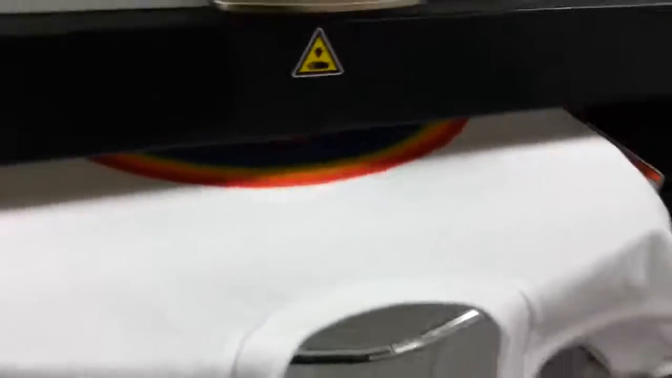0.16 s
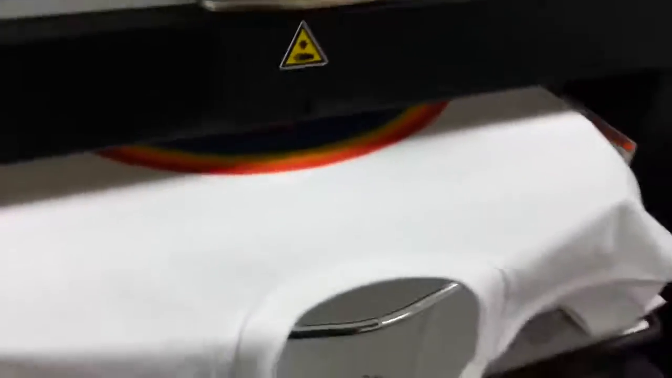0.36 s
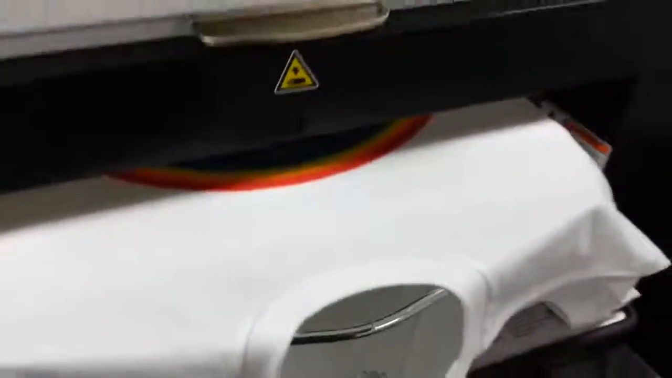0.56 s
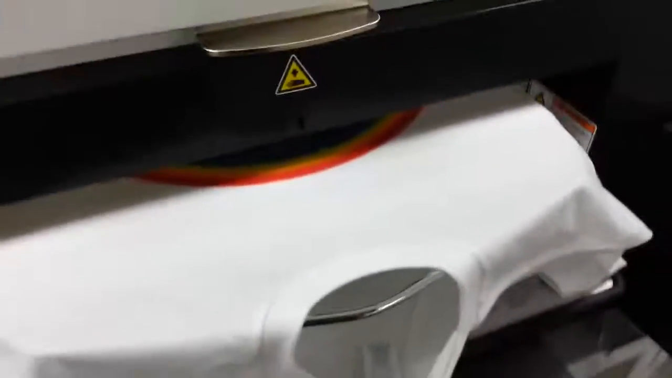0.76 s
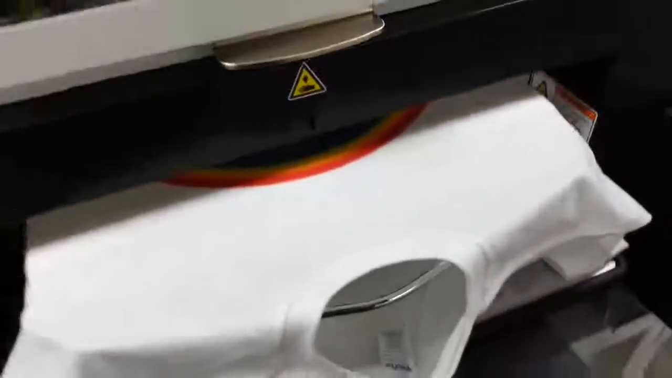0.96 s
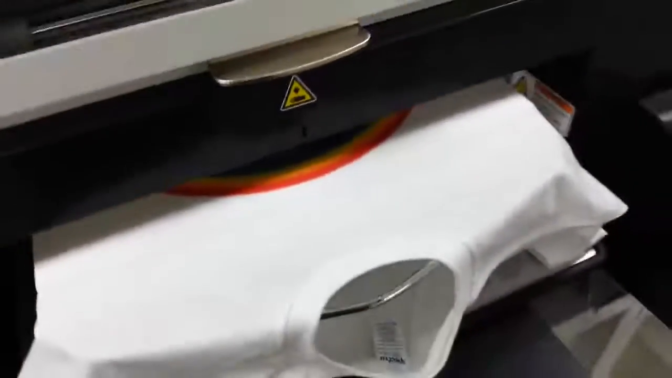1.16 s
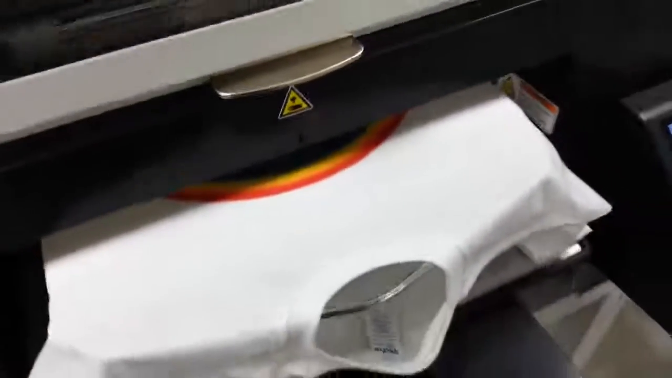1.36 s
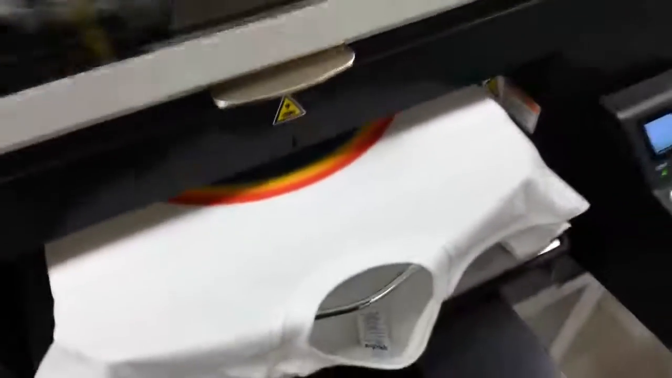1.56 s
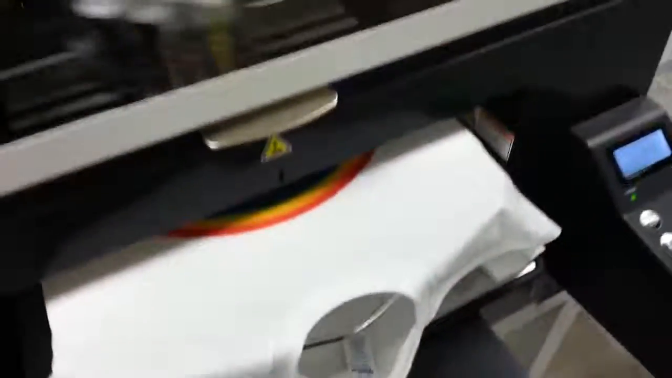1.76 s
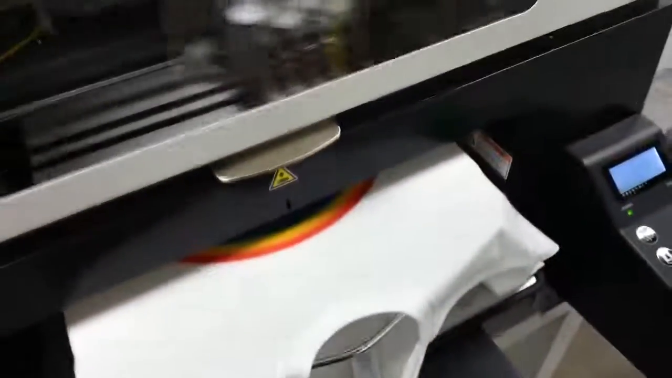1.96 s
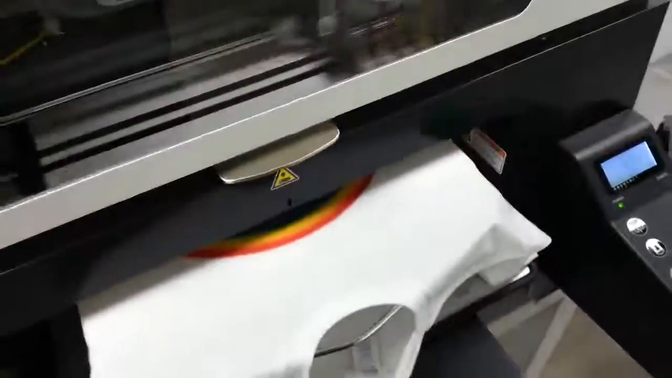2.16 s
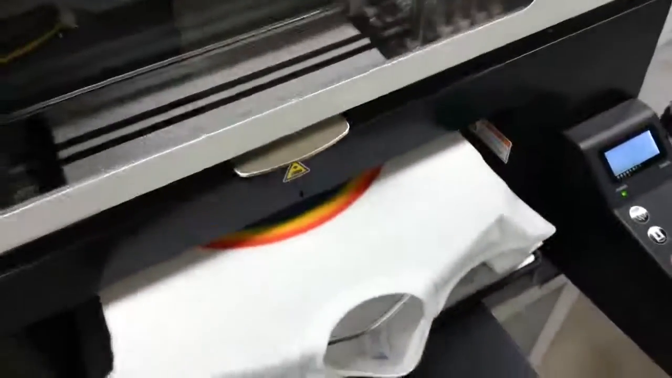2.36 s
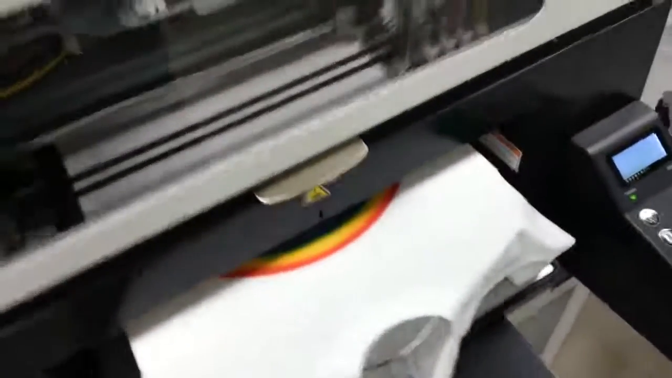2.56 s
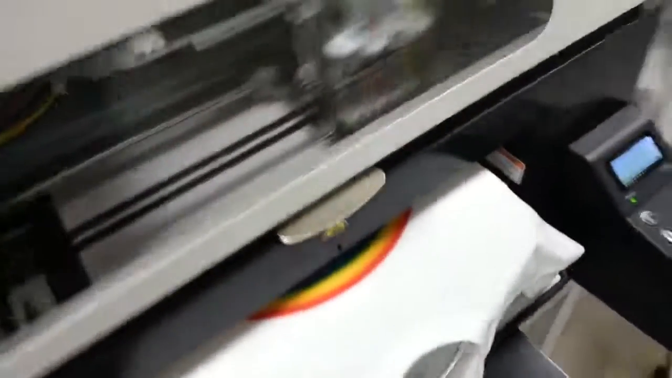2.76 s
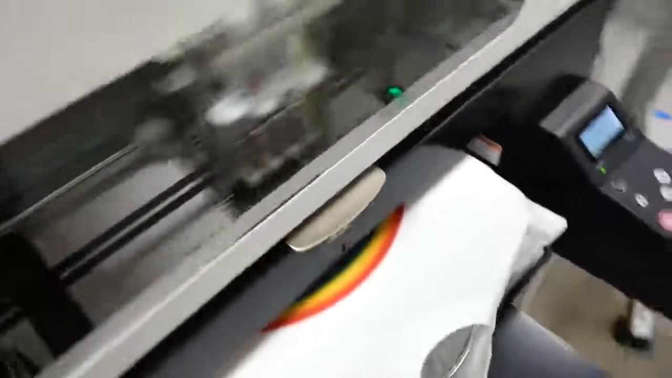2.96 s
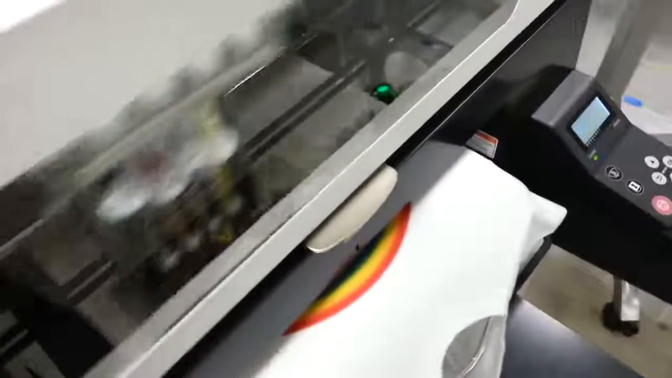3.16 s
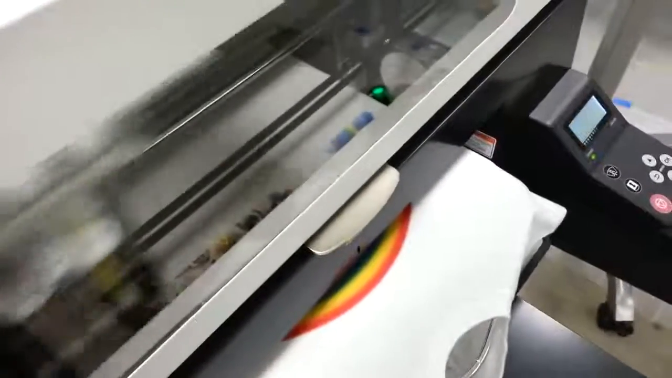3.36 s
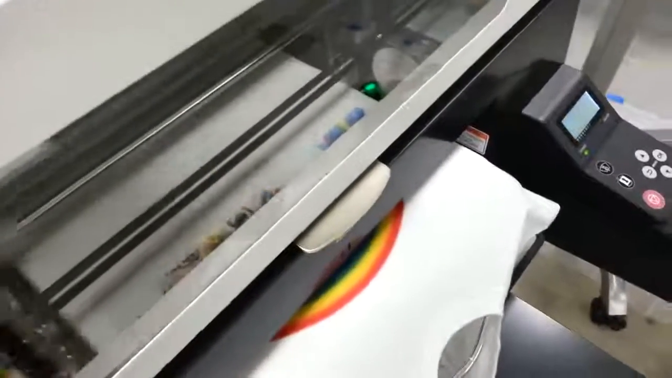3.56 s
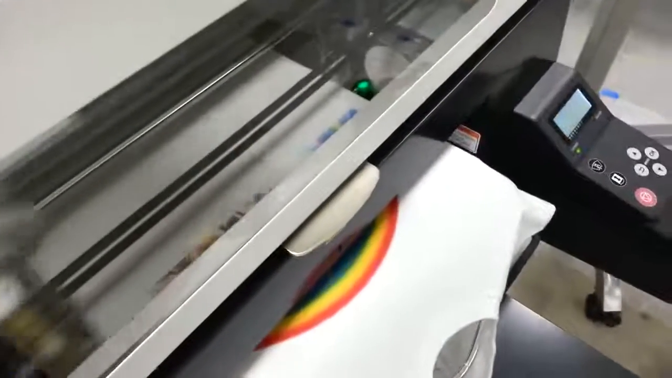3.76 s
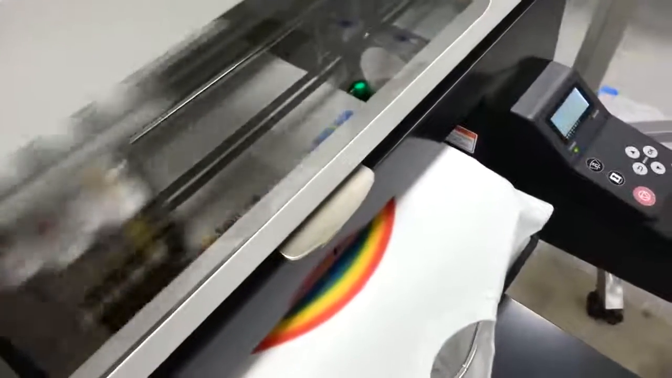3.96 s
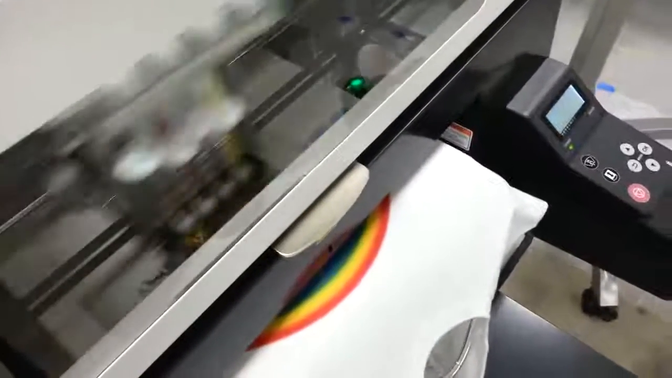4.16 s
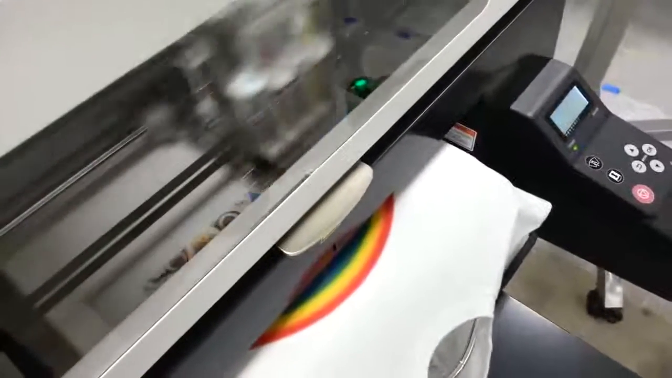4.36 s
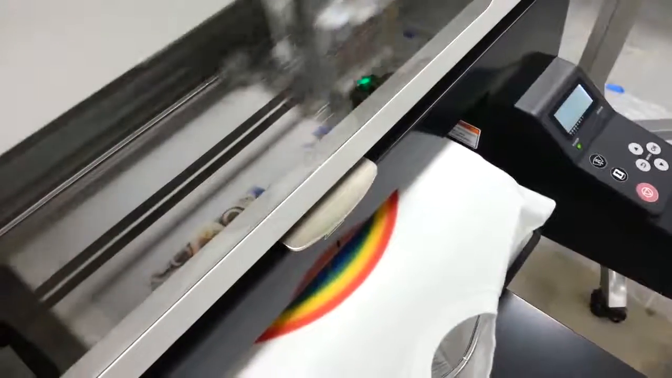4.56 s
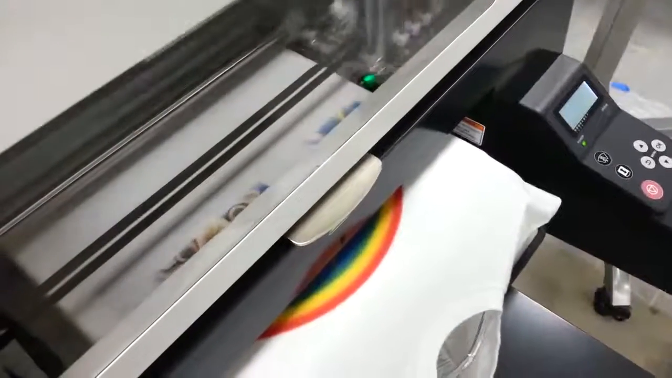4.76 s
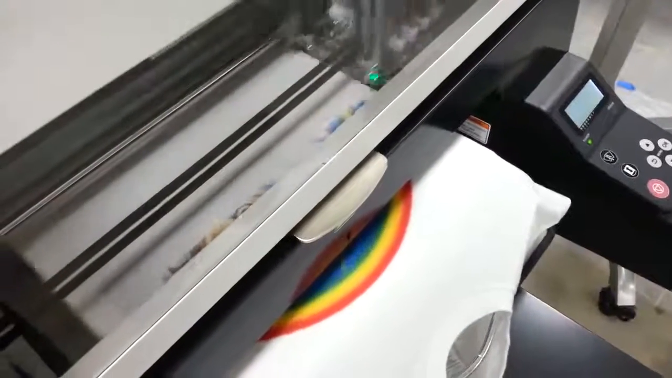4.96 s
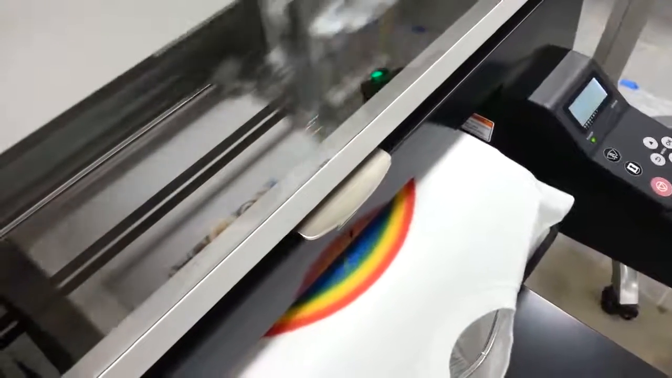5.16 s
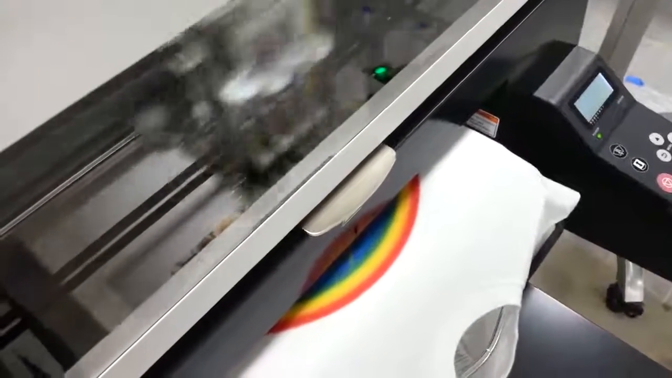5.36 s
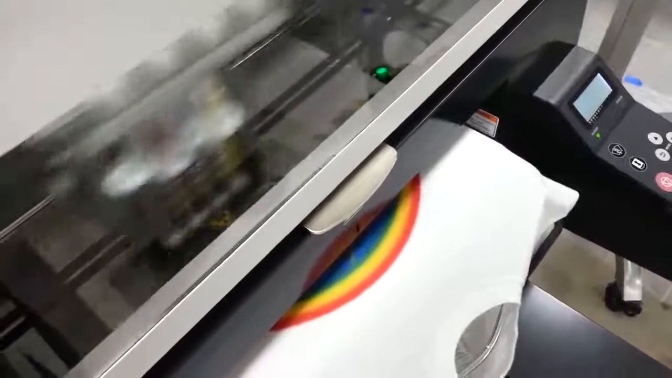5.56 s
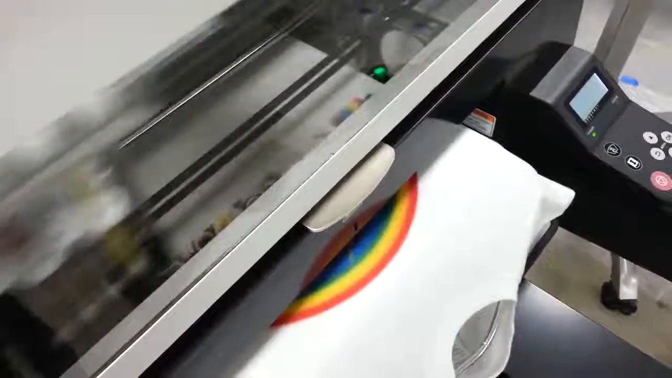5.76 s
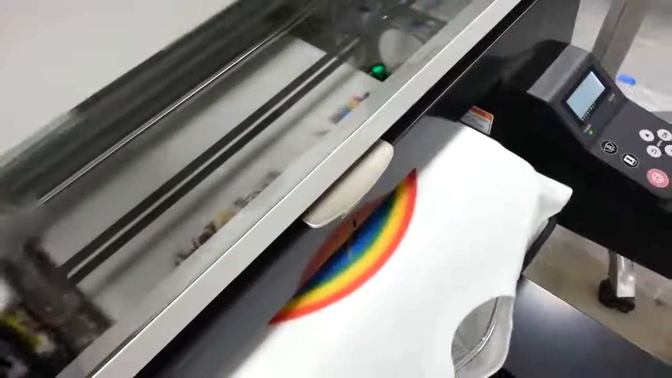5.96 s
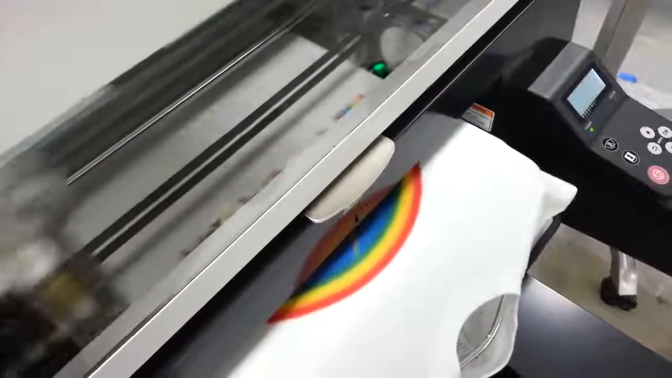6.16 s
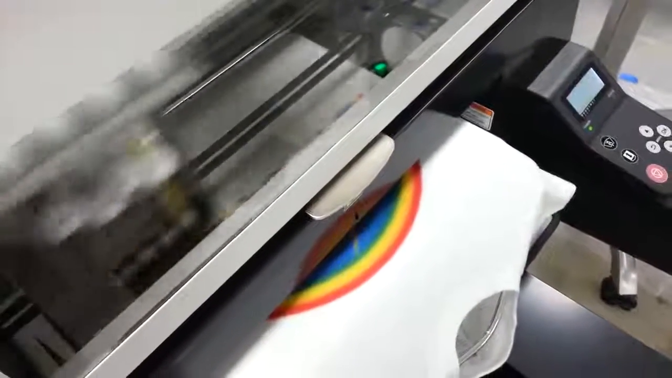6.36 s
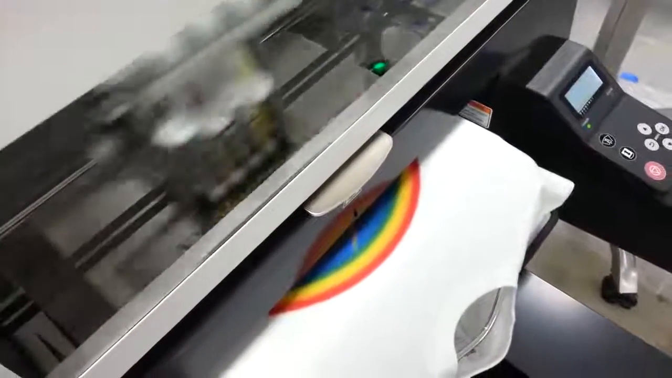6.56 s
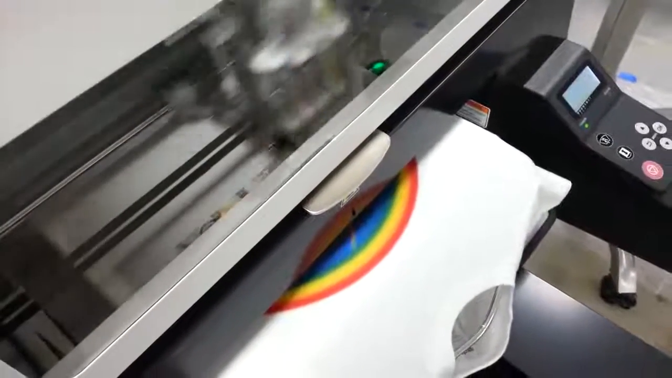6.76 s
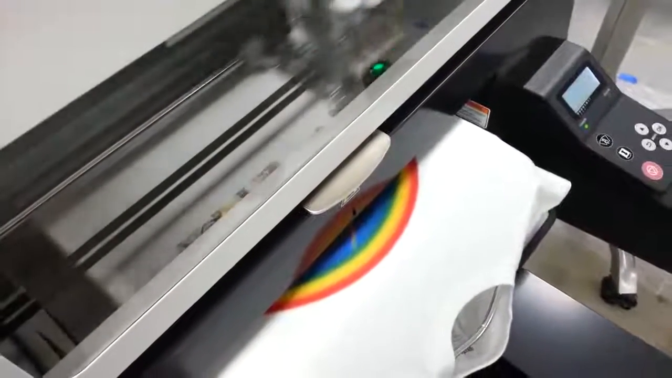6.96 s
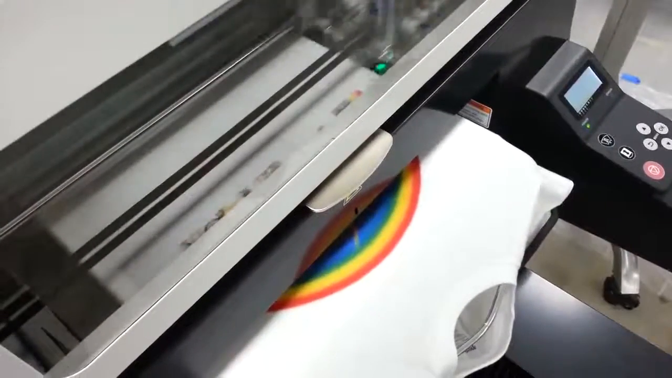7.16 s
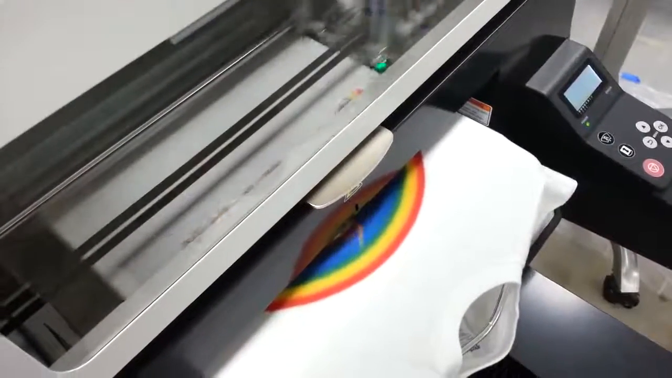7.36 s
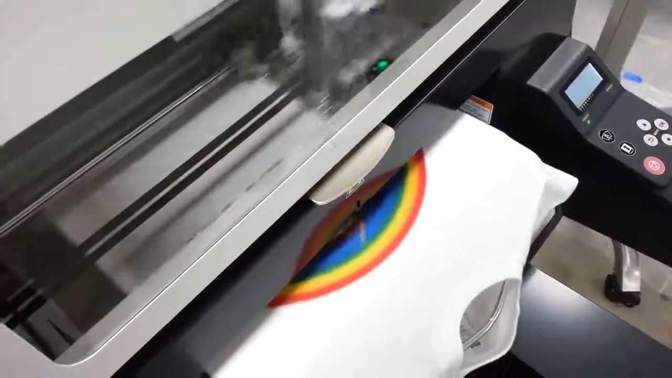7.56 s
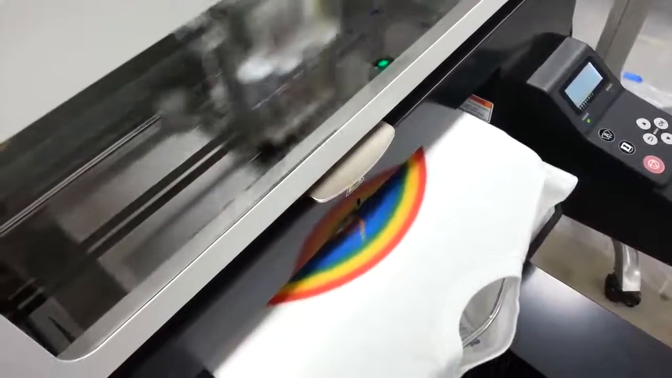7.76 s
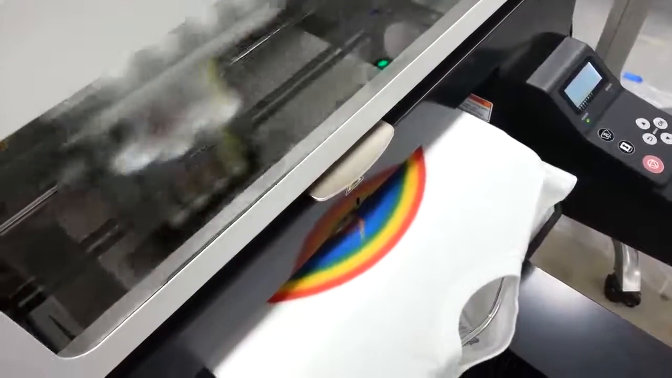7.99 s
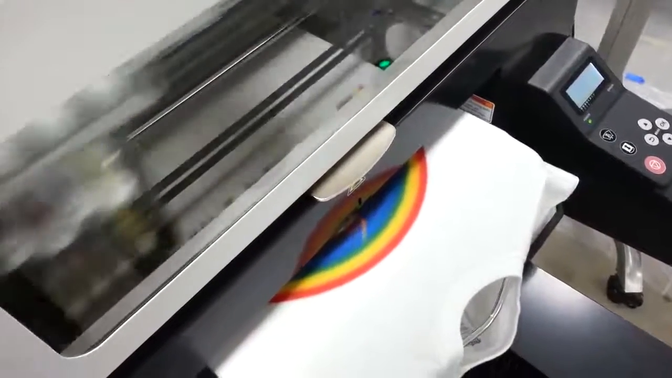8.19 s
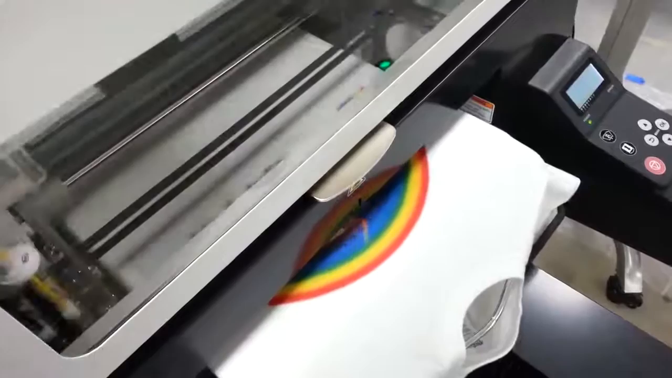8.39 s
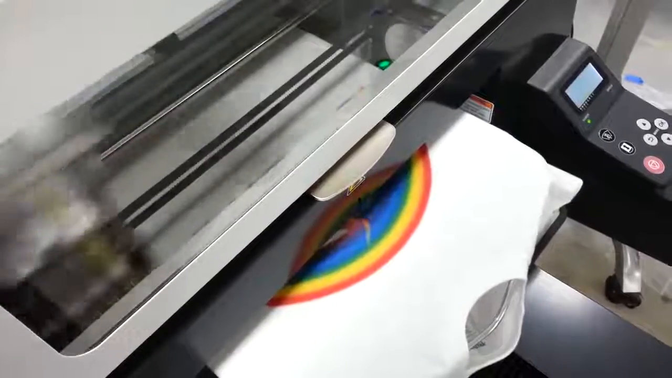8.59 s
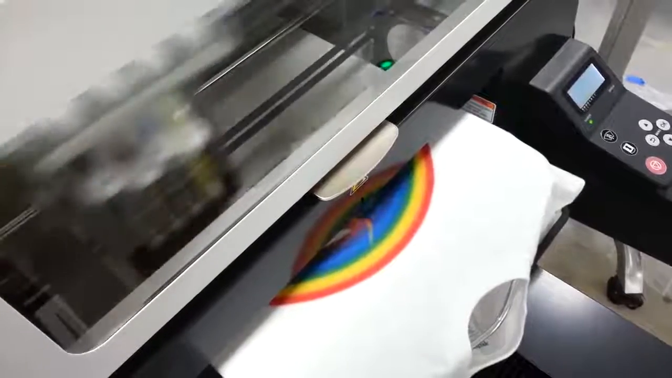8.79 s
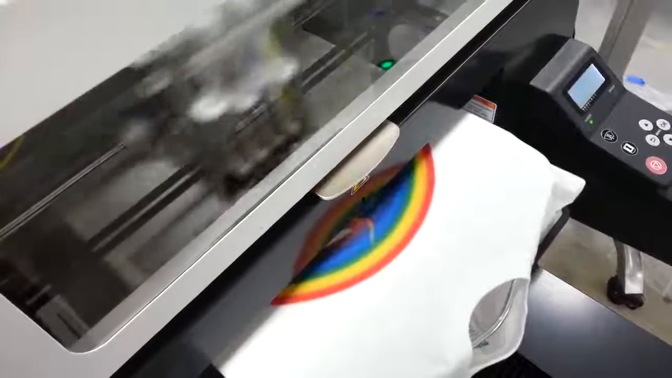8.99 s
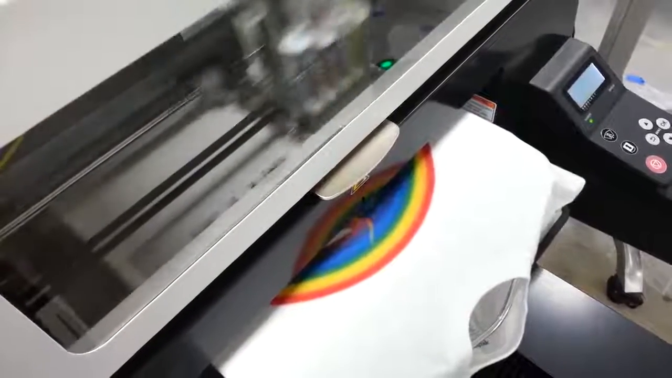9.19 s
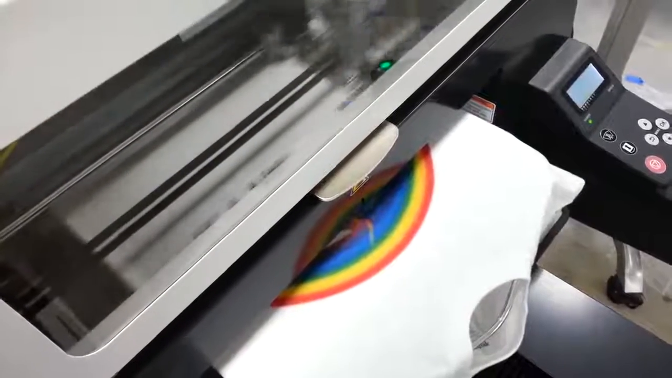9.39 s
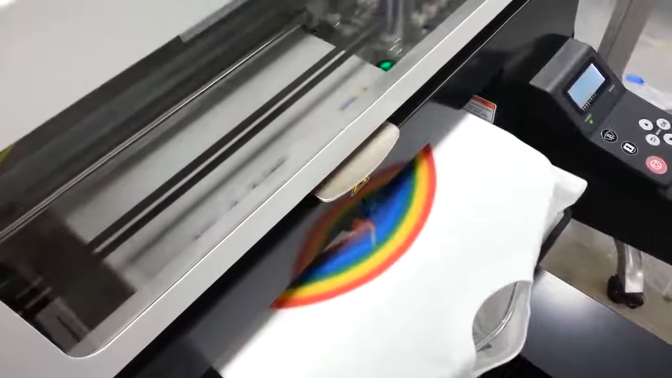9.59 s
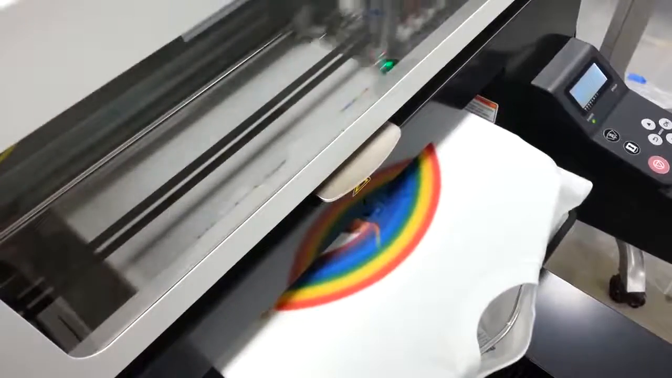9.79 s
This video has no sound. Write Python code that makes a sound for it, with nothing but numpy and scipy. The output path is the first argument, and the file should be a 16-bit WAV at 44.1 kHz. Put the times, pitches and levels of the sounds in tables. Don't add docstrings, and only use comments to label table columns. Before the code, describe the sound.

In a reverberant workshop, a nearby garment printer works over steady mains hum and fan wash. At about 0.17 s the belt snatches with the hardest bracket rattle, and the carriage reaches full speed by 0.25 s: a constant-pitch, buzzy tooth whine with mid-heavy rail hiss. It eases off near 1.1 s, the whine falling away, with a dull thump, a brief lull, then another thump and surge into the return stroke by 1.4 s. The cycle repeats with braking near 2.3, 3.5, 4.7, 5.9, 7.1, 8.3 and 9.5 s. Rattles mark outward starts near 2.6, 5.0, 7.4 and 9.8 s; return strokes throb more. Handling ticks occur near 0.7, 1.65 to 1.8 (the strongest) and 2.9 s. The whine's overtones shift as the handheld stereo microphone moves early on; faint wall echoes follow, and the last outward stroke is just under way at the end.

```python
import sys
import numpy as np
from scipy import signal
from scipy.io import wavfile
from scipy.ndimage import uniform_filter1d, map_coordinates

SR = 44100
rng = np.random.default_rng(int(sys.argv[2]) if len(sys.argv) > 2 else 0)


def unload_audio(sound):
    columns = np.transpose(np.atleast_2d(sound))
    steps = np.round(np.clip(columns, -1, 1) * 32767)
    wavfile.write(sys.argv[1], SR, steps.astype(np.int16))


def invert_db(x):
    u = np.asarray(x, float) / 20
    return 10 ** u


N = 433503
T = np.arange(N) / SR
TEETH = 9

# (start of braking from the stroke before [s], full speed reached [s])
STROKES = [
    (-.13, .245),
    (1.075, 1.44),
    (2.27, 2.63),
    (3.47, 3.85),
    (4.675, 5.04),
    (5.88, 6.26),
    (7.085, 7.445),
    (8.285, 8.655),
    (9.485, 9.855),
]
SHAFT_HZ = [62.82, 62.70]
# (time [s], order 18 [dB], order 27 [dB], order 36 [dB], rail [dB])
NEARNESS = [(.25, -5, -2, 1.5, 2.5), (.45, -5.5, 6, 5.8, 3), (.55, -15.5, 9.5, -1, 1.5),
            (1.1, -8, 1.5, .3, -1.2), (1.5, -1, -12, -5, -0.5), (1.8, -3.5, -19, -8.5, -0.1),
            (2.3, -3, -12, 2.5, 0.5), (2.8, -2.2, -5, 0, 0.7), (3.3, 1.1, -1, 3.5, 0.6),
            (4.2, 0.3, 3.3, -0.4, -1.1), (5.4, -0.2, -4.5, -.3, 1.25), (6.7, 2.5, 4.5, 2.5, -0.2),
            (7.7, 0.5, 1, -4.5, 1), (9, 3.5, 3, 2, .3)]


def motor(speed, turns, outward):
    whine_side = [-9.5, 0.41, -5.5]
    weak_orders = [9, 16, 26, 28, 29, 32, 34, 35, 37, 44, 45, 52, 54, 55, 58, 63, 64, 72, 73, 80, 99]
    # (outward [dB], backward [dB], side minus mid [dB])
    weak_levels = [(-42, -59, -21), (-50, -49, 5), (-41, -47.5, 4), (-36.5, -45, 4.5), (-50, -52, -6),
                   (-45.5, -42, 8.5), (-48, -59, -14), (-51, -36.5, 5), (-42.5, -40, -13), (-40.5, -55, -8),
                   (-44, -60, 6), (-45.5, -55, -12), (-50, -43, 4), (-43.5, -70, -3), (-47, -71, 6),
                   (-50, -47, -4), (-49.5, -46, -1), (-58, -47, 0), (-66, -70, -17), (-52.5, -70, -8),
                   (-62.5, -55.5, -8)]
    idler_orders = [54, 58]

    share = speed / SHAFT_HZ[0]
    heard = np.clip((share - .4) / .2, 0, 1)
    shudder = 1 - share
    turns = turns + .12 * shudder * wander(200)
    out = np.zeros((2, N))
    for multiple, side_db, place_db in zip([2, 3, 4], whine_side, whine_db(T)):
        level_db = place_db + 2.2 * wander(25) - 28 * shudder * abs(wander(200))
        out += partial(TEETH * multiple, heard * invert_db(level_db), side_db, turns)

    load_db = rail_db(T)[1]
    throb_db = chain_db(turns, outward)
    fall = np.where(stroke_age(T)[0] < 0, 4, 10)
    for order, (out_db, back_db, side_db) in zip(weak_orders, weak_levels):
        bite = 1.9 if order % 18 == 0 else .6
        throb = 1.9 if order in (72, 73) else .5
        level_db = np.where(outward, out_db, back_db) + bite * load_db
        level_db += 2.2 * wander(60) + throb * throb_db
        if order in idler_orders:
            level_db += 8.0 * (T < 1.3)
        out += partial(order, invert_db(level_db) * share ** fall, side_db, turns)
    return out


def partial(order, level, side_db, turns):
    blur = (0.31 + 0.0047 * order) * wander(14)
    phase = 2 * np.pi * (order * turns + rng.random()) + blur
    side = invert_db(side_db) * np.cos(phase + 2 * np.pi * rng.random() + 0.67 * wander(1.384))
    return np.sqrt(2) * level * (np.cos(phase) + np.array([side, -side]))


def whine_db(t):
    # (time from full speed [s], order 18 [dB], order 27 [dB], order 36 [dB])
    span_out = [(-.07, -37, -45, -40), (-.043, -10.5, -47, -23.5), (-.015, -17, -42, -32),
                (.025, -19.5, -30, -18), (.1, -23, -32.5, -32), (.37, -21, -39.5, -23),
                (.6, -21.5, -34, -26), (.82, -22, -36.5, -28), (.92, -50, -48, -73)]
    # (time from full speed [s], order 18 [dB], order 27 [dB], order 36 [dB])
    span_back = [(-.045, -44, -45, -40), (.01, -28.5, -34.5, -21), (.1, -29, -36.5, -28),
                 (.25, -22, -33.5, -22), (.45, -31, -37, -32.5), (.6, -25.5, -34.5, -26),
                 (.82, -31.5, -33, -47), (.865, -21.5, -45, -46), (.93, -42, -36, -48)]

    age, outward = stroke_age(t)
    out_s, *out_levels = np.transpose(span_out)
    back_s, *back_levels = np.transpose(span_back)
    camera_s, *near_levels = np.transpose(NEARNESS)
    levels = []
    for out_db, back_db, near_db in zip(out_levels, back_levels, near_levels):
        belt_db = np.where(outward, np.interp(age, out_s, out_db), np.interp(age, back_s, back_db))
        levels.append(belt_db + np.interp(t, camera_s, near_db))
    return levels


def motion():
    # (time before full speed [s], share of full speed)
    pull_away = [(.11, 0), (.06, .62), (.04, .8), (.018, .93), (0, 1)]

    times, hz = [], []
    for k, (brake, full) in enumerate(STROKES):
        old_hz, new_hz = SHAFT_HZ[k % 2], SHAFT_HZ[1 - k % 2]
        times += [brake, brake + .1]
        hz += [old_hz, .76 * old_hz]
        slower = 1 + .5 * (k % 2)
        for before_s, share in pull_away:
            times.append(full - before_s * slower)
            hz.append(share * new_hz)
    speed = np.interp(T, times, hz)
    full = np.transpose(STROKES)[1]
    stroke = np.searchsorted(full - pull_away[0][0], T)
    total = np.cumsum(speed) / SR
    turns = total - np.interp(np.append(0, full), T, total)[stroke]
    return speed, turns, stroke % 2


def stroke_age(t):
    full = np.append(-.96, np.transpose(STROKES)[1])
    stroke = np.searchsorted(full[1:] - .15, t)
    return t - full[stroke], stroke % 2 == 1


def carriage(turns, outward):
    # (frequency [Hz], level [dB per Hz])
    outward_colour = [(120, -56.5), (200, -32.5), (240, -11.5), (293, -12.5), (564, -18.5), (923, -9),
                      (1130, -6), (1230, -15), (2290, -7.5), (2600, -12.5), (7480, -32.5), (12000, -40),
                      (14400, -41), (15500, -107)]
    # (frequency [Hz], level [dB per Hz])
    backward_colour = [(120, -43), (200, -21), (240, -7.5), (293, -23), (352, -11), (437, -25), (906, -10),
                       (1130, -9), (1280, -14.5), (2290, -7), (2700, -14.5), (10400, -36), (13900, -40),
                       (15500, -106)]
    # (frequency [Hz], width [Hz], level [dB])
    housing = [(762, 73, 8.5), (892, 68, -10.5), (1697, 260, 6.5), (2310, 300, 4.5), (2850, 170, 2),
               (3330, 600, 2), (4570, 850, 4.5), (5890, 140, -3), (7650, 570, -17), (8400, 240, 2)]
    layer_hz = [1400, 3800, 10000]

    throb_db = chain_db(turns, outward)

    def level_db(hz, t):
        effort = rail_db(t) + [[-6.5], [0], [0]]
        share = np.array([read(list(zip(layer_hz, row)), hz[:, 0]) for row in np.eye(3)])
        going_out = np.interp(t, T, outward) > .5
        colour = np.where(going_out, read(outward_colour, hz) + 0.091, read(backward_colour, hz) - .1)
        rings = sum(db / (1 + (2 * (hz - f) / width) ** 2) for f, width, db in housing)
        depth = np.clip(hz / 6000, 0, 1.1) + 0.56 / (1 + ((hz - 4550) / 300) ** 2)
        return colour + rings + share.T @ effort + np.interp(t, T, throb_db) * depth

    ripple = 0.4 * np.cos(2 * np.pi * TEETH * turns) + 0.12 * np.cos(2 * np.pi * turns)
    rail = invert_db(-24.5) * evened(noise(level_db, size=512, patchy_db=2.0))
    body = signal.sosfilt(signal.butter(2, 3500, fs=SR, output="sos"), rail)
    return rail + ripple * (body + 0.2 * (rail - body))


def rail_db(t):
    # (standstill [dB], outward surge [dB], backward surge [dB], braking [dB], coasting after the brake [s])
    rail_layers = [
        (-15, 11, 9, 3.5, 0.097),
        (-16, 6.5, 5, -2, 0.06),
        (-30.5, 4, 7, -10.2, 0.03),
    ]
    rise_s, surge_s, settle_s = 0.12, 0.041, 0.081
    cruise_s, fade_s, brake_s = 0.844, 0.12, 0.031

    age, outward = stroke_age(t)
    surge = np.where(age < 0, np.exp(-(age / surge_s) ** 2), np.exp(-abs(age) / settle_s))
    brake = np.exp(-((age - cruise_s - brake_s) / brake_s) ** 2)
    camera_s, *_, near_db = np.transpose(NEARNESS)
    layers = []
    for still_db, out_db, back_db, brake_db, coast_s in rail_layers:
        not_yet = -(age + surge_s) / rise_s
        over = (age - cruise_s - coast_s) / fade_s
        stillness = np.clip(np.maximum(not_yet, over), 0, 1)
        level = still_db * stillness + np.where(outward, out_db, back_db) * surge
        layers.append(level + brake_db * brake + np.interp(t, camera_s, near_db))
    return np.array(layers)


def chain_db(turns, outward):
    turns_per_link = 6.69
    return np.where(outward, .9, 2.7) * np.cos(2 * np.pi * (turns + 0.66) / turns_per_link)


def knocks():
    blows = frame_thumps() + belt_snatches() + camera_ticks()
    return signal.sosfilt(signal.butter(2, 170, "high", fs=SR, output="sos"), blows)


def thumps():
    # (time after braking [s], level [dB], pitch [Hz])
    brake_thump = (.09, -24, 349)
    # (time before full speed [s], outward [dB], backward [dB], pitch [Hz])
    start_thump = (0.06, -19, -18, 310.5)

    after_s, brake_db, brake_hz = brake_thump
    before_s, *start_db, start_hz = start_thump
    rows = [(brake + after_s, brake_db, brake_hz) for brake, _ in STROKES[1:]]
    for k, (_, full) in enumerate(STROKES):
        rows.append((full - before_s, start_db[k % 2], start_hz))
    return rows


def frame_thumps():
    out, t = np.zeros(N), np.arange(9000) / SR
    for s, db, hz in thumps():
        judder = 1 + .45 * evened(uniform_filter1d(rng.standard_normal(len(t)), size=180))
        swell = invert_db(db - 60 * t / 0.27) * (1 - np.exp(-t / 0.0056))
        add(out, s, judder * swell * np.sin(2 * np.pi * hz * t * (1.03 - 0.456 * t)))
    return out


def belt_snatches():
    # (time [s], peak [dB])
    snatches = [
        (0.165, -5),
        (2.566, -8),
        (4.986, -8.5),
        (7.392, -7),
        (9.79, -9),
    ]
    # (frequency [Hz], level [dB], time to fall 60 dB [s])
    bracket = [(686, -8.5, 0.12), (880.5, -6.5, 0.2), (1640, -12, .06), (2070, -3, 0.05), (2677, 1, 0.04),
               (3570, -8.5, 0.049)]

    out, t = np.zeros(N), np.arange(9000) / SR
    ring = sum(invert_db(db - 60 * t / t60) * np.sin(2 * np.pi * hz * t) for hz, db, t60 in bracket)
    for s, db in snatches:
        rattle = rng.standard_normal(len(t)) * np.exp(-t / 0.022) * np.minimum(t / 0.015, 1)
        add(out, s, invert_db(db - 25.5) * signal.fftconvolve(rattle, ring)[:len(t)])
    return out


def camera_ticks():
    # (time [s], peak [dB], low knock [dB])
    ticks = [
        (0.71, -11.5, -25),
        (1.6485, -24, -31),
        (1.6735, -9.5, -13.5),
        (1.7904, -29, -37),
        (2.88, -20, -26),
    ]

    out, t = np.zeros(N), np.arange(9000) / SR
    for s, db, low_db in ticks:
        snap = np.exp(-t / .00015) * np.sin(2 * np.pi * 3000 * t + 1.1) * 2
        low_knock = np.exp(-t / .0015) * np.sin(2 * np.pi * 800 * t + .5)
        add(out, s + .0012, invert_db(db) * snap - invert_db(low_db + 7) * low_knock)
    return out


def room(x):
    # (frequency [Hz], time to fall 60 dB [s])
    decay = [(200, 1.6), (1200, 2.2), (3000, 1.46), (8000, 0.045)]

    taps = np.zeros((2, SR))
    at = np.arange(400, SR - 20, 20) + rng.integers(0, 20, (2, (SR - 401) // 20))
    np.put_along_axis(taps, at, rng.choice([-1., 1.], at.shape), 1)
    hz, t, z = signal.stft(taps, SR, nperseg=256)
    fading = invert_db(-60 * t / read(decay, hz)[:, None])
    tail = signal.istft(z * fading, SR, nperseg=256)[1]
    return signal.fftconvolve(x[None], tail / np.linalg.norm(tail[0]), axes=1)[:, :N]


def workshop():
    # (frequency [Hz], level [dB], width [Hz])
    hum = [(59, -60.5, 4.7), (122.4, -54.5, 4.7), (239.9, -30.5, 0.9), (355.3, -41, 3.1), (709, -41, 16.7),
           (885, -63, 7.7), (995, -41, 23.5)]
    # (frequency [Hz], level [dB per Hz])
    air = [(12, -55.5), (20, -20), (59, -36.5), (147, -9), (242, -6.5), (433, -11), (693, -6.5),
           (1110, -8.5), (1350, -16), (2220, -15.5), (7510, -35.5), (9900, -50), (11100, -46),
           (12000, -101.5), (15000, -100)]

    lines = np.zeros(N)
    for hz, db, width in hum:
        phase = 2 * np.pi * np.cumsum(hz + width * wander(30) / 2) / SR
        lines += invert_db(db + 2.04 * wander(7.2)) * np.sqrt(2) * np.cos(phase)
    wash = noise(lambda hz, t: read(air, hz) + 0 * t, size=2048, patchy_db=1.5)
    nearer_db = np.interp(T, [2.2, 2.8], [-3.5, 0])
    return lines * invert_db(nearer_db + np.array([[-.8], [.8]])) + invert_db(-31) * evened(wash)


def noise(level_db, size, patchy_db):
    # (frequency [Hz], left-right likeness)
    likeness = [(60, 0.78), (150, 0.99), (380, 0.89), (950, 0.56), (2380, 0.12), (5980, -0.062),
                (15000, -0.13)]
    # (frequency [Hz], left minus right [dB])
    lean = [(60, 1), (130, 0.5), (290, 1.5), (640, -1), (1410, 4), (3100, 0), (4500, -7), (8000, 5.5),
            (15000, 6.5)]

    hz = np.fft.rfftfreq(size, 1 / SR)
    t = np.arange(4 * N // size + 5) * size / 4 / SR
    a, b, c, d, patches = rng.standard_normal((len(t), len(hz), 5)).T
    patches = uniform_filter1d(patches, size=size // 170, axis=0)
    patches = evened(uniform_filter1d(patches, size=8192 // size, axis=1))
    same = np.clip(read(likeness, hz), -1, 1)[:, None]
    left = a + 1j * b
    right = same * left + np.sqrt(1 - same ** 2) * (c + 1j * d)
    flaky = 1 + 1.4 * np.clip(hz[:, None] / 3000 - 1.7, 0, 1)
    lean_db = np.multiply.outer([.5, -.5], read(lean, hz))[..., None]
    z = np.array([left, right]) * invert_db(level_db(hz[:, None], t) + patchy_db * flaky * patches + lean_db)
    return signal.istft(z, nperseg=size, noverlap=3 * size // 4)[1][:, :N]


def wander(hz):
    f = np.geomspace(hz / 15, hz, 16)[:, None]
    slow_t = T[::256]
    slow = (np.sin(2 * np.pi * (f * slow_t + rng.random(f.shape))) / np.sqrt(f)).sum(0)
    return np.interp(T, slow_t, evened(slow))


def evened(x):
    return x / np.sqrt(np.mean(x ** 2) + 1e-20)


def read(points, hz):
    f, value = np.transpose(points)
    return np.interp(np.log(hz + 1), np.log(f + 1), value)


def add(mix, s, sound):
    part = mix[round(s * SR):][:len(sound)]
    part += sound[:len(part)]


def scene():
    # (time [s], left minus right [dB])
    pan = [(0.0, -1.5), (1.58, -3), (1.94, -1), (3.06, -1.5), (3.45, 1), (4.41, -3), (4.84, -0.5),
           (7.06, -0.5), (7.23, -0.5), (9.83, 0.5)]

    speed, turns, outward = motion()
    printer = motor(speed, turns, outward) + carriage(turns, outward) + knocks()
    pan_db = np.interp(T, *np.transpose(pan))
    travel_s = np.cumsum(np.where(outward, speed, -speed)) / SR * 4e-5
    far = map_coordinates(printer[0], [(T - travel_s - .003) * SR], order=3)
    walls = invert_db(-16.5) * room(far)
    return printer * invert_db(np.array([pan_db, -pan_db]) / 2) + walls + workshop()


def top_cut(x):
    return signal.sosfilt(signal.butter(12, 15800, fs=SR, output="sos"), x)


def record(dry):
    limited = np.tanh(dry / 1.8) * 1.8
    treble_cut = signal.firwin(767, 14780, fs=SR)
    mix = signal.oaconvolve(limited, treble_cut[None], "same")
    return top_cut(mix)


dry = scene()
out = record(dry)
unload_audio(out)
```